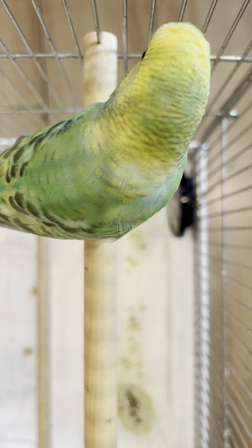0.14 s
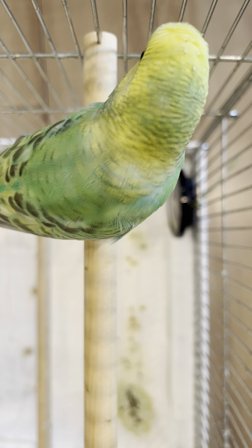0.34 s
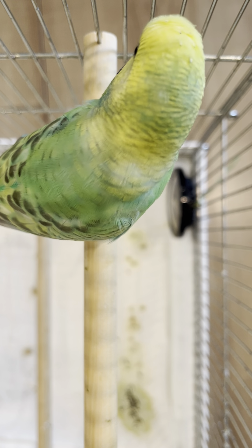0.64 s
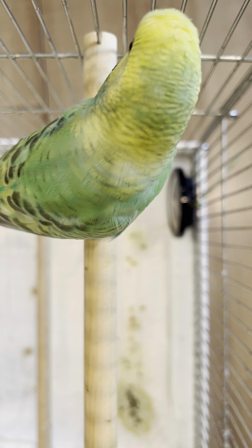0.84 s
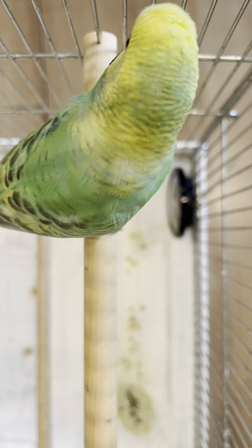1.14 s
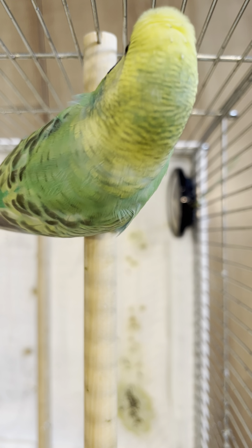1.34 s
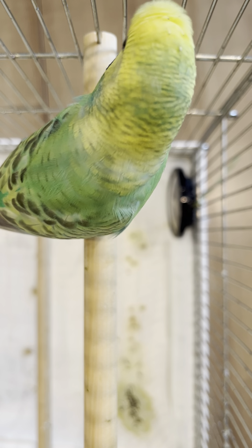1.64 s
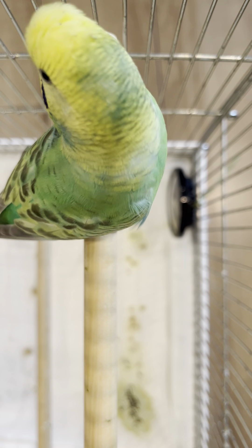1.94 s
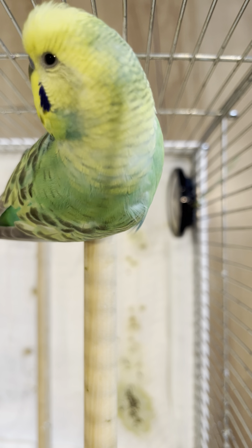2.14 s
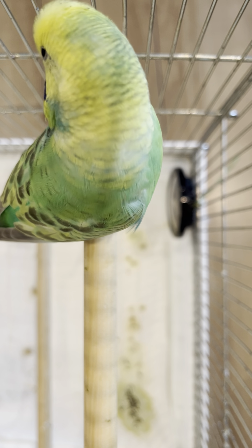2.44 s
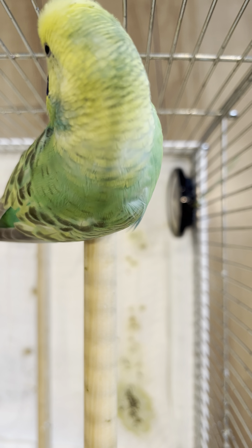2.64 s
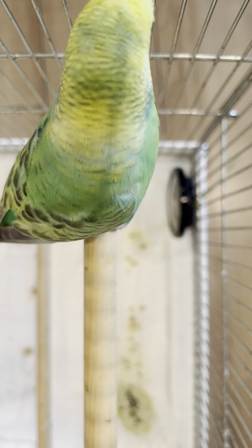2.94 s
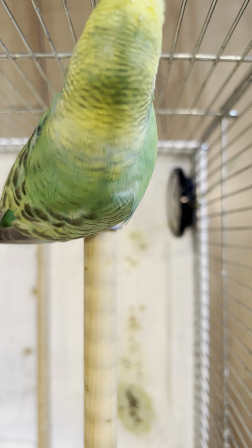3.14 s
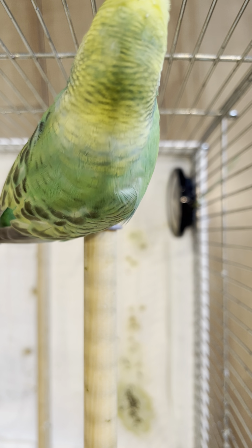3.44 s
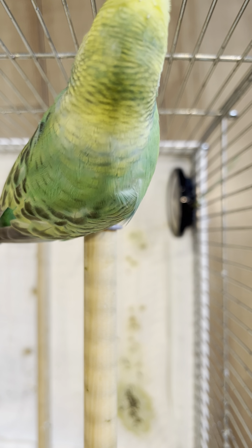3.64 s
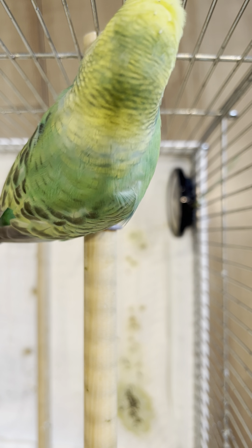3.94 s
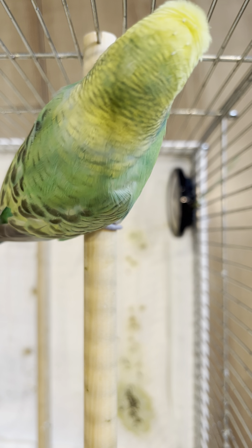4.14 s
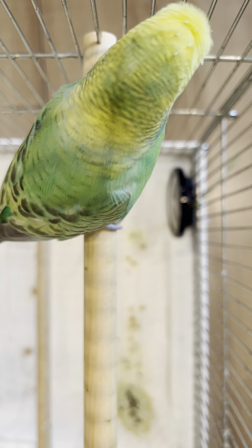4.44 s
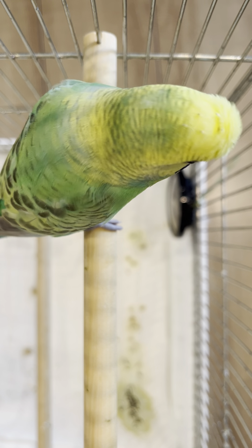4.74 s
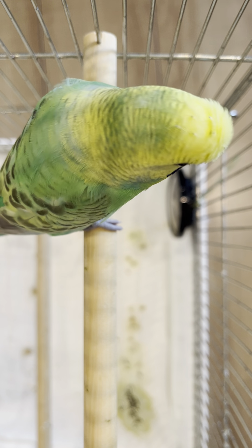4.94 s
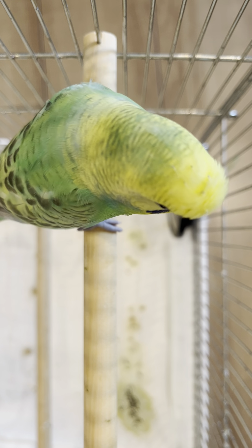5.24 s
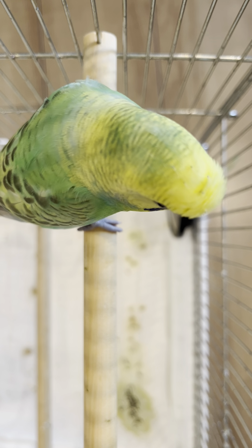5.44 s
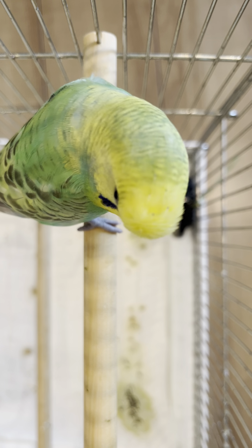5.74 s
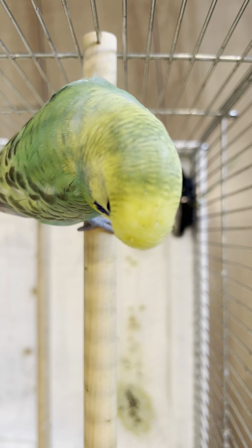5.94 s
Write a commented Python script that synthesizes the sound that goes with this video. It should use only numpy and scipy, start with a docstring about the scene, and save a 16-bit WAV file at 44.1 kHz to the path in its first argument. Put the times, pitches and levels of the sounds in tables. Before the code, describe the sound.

Close stereo phone pickup of one small parrot in a wire cage indoors, over low electrical hum and soft room air. Its song is irregular: faint peeps, low mutters, a piercing rising screech with a harsh squawk, and a pause with feather rustle. Chirps, rattling and crackling follow, then an abrupt snap, one very bright chirp, a warbling trill and soft closing peeps. Cage and walls give short reflections.

```python
"""Budgerigar on its perch

A budgerigar warbles close to a phone, in a small room with a mains hum, rumble and soft air.
Its whistles are gliding tones chopped by a flutter, with noise where they break into rasps.
Between them come low harmonic mutters, squawks of pulses and air ringing the throat, and a snap,
beak ticks and feather rustles of filtered noise. The cage and the walls answer with short echoes."""
import sys
import numpy as np
from scipy import signal
from scipy.fft import rfft, irfft
from scipy.io import wavfile
from scipy.ndimage import uniform_filter1d

SR = 44100
rng = np.random.default_rng(int(sys.argv[2]) if len(sys.argv) > 2 else 0)


def store_wav(level_fs):
    """Save 16-bit WAV to argv[1]."""
    pcm = np.round(np.clip(np.atleast_2d(level_fs), -1, 1) * 32767)
    wavfile.write(sys.argv[1], SR, pcm.T.astype(np.int16))


N = 269010
T = np.arange(N) / SR  # time in s

# Colours are filter curves: hz, gain_db. Bursts: start_s, attack_s, hold_s, release_s per 20 dB, level_db.
# Mains hum: multiple of the hum pitch, level_db against each other
HUM_PARTIALS = [(1, 0.5), (2, -28.5), (3, -17), (5, -27)]
HUM_DB, RUMBLE_DB, AIR_DB = -47.5, -59, -63  # the hum and air waver around these
# Low room rumble, and the hiss of the room's air: hz, gain_db
RUMBLE_COLOUR = [(25, -25), (50, 7), (90, -5), (140, 4.5), (200, -12.5), (400, -12.5), (800, -28)]
AIR_COLOUR = [(200, 4.5), (350, -2.5), (550, -2.5), (900, -12.5), (1500, -14.5), (2200, -16.5), (3200, -26),
              (4800, -26), (6500, -37), (10000, -31.5), (15000, -57)]
# The cage rumbles dully as the bird shifts: bursts (start_s, attack_s, hold_s, release_s, level_db)
CAGE_SHIFTS = [(1.2, 0.0734, 0.0867, 0.17, -46.5), (1.58, 0.076, 0.082, 0.2354, -49),
               (2.62, 0.0401, 0.156, .6, -52), (3.96, .03, 0.0302, 0.23, -53),
               (4.75, 0.036, 0.0667, 0.0744, -52.5), (5.7, 0.052, 0.033, 0.25, -54)]
# The hum and rumble dip briefly: centre_s, half_length_s (to 1/e of the depth), depth_db
LOW_DIP = (5.3, 0.1334, -9)
# Room decay, quickest at the top: hz, time_s to fall 60 dB
ROOM_T60 = [(300, .6), (1500, .6), (3500, .6), (8000, .5), (11000, .36), (15000, .27)]
# Phase difference between left and right at each pitch, which gives the bird its stereo width:
# hz, phase_radians
STEREO_PHASE = [(0, 1), (1900, 0.68), (2400, 1.06), (2950, 2.214), (3400, 1.414), (4000, 1.336),
                (4800, 1.478), (5600, 2.643), (6700, 3.963), (8350, 4.64), (10200, 7.07), (11200, 8.036),
                (12800, 9.5), (15200, 11.31)]
TOP_HZ = 15750  # top of the phone's treble

# Feathers brush as the bird turns its head: bursts (start_s, attack_s, hold_s, release_s, level_db)
RUSTLES = [(2.226, 0.0048, 0.026, 0.0154, -60.5), (2.39, 0.042, .08, 0.09, -62),
           (5.84, 0.0173, 0.016, 0.02, -57.5)]
# Colour of the feathers: hz, gain_db
FEATHER_COLOUR = [(800, -6), (2200, 1.5), (4500, -7.5), (6000, -19), (9000, -19), (14000, -32.5)]
# Beak ticks: time_s, level_db before the ticks' trim, treble_db against the whole
TICKS = [(0.694, -24.5, -35.5), (2.514, -31, -35), (2.722, -37, -35.5), (2.798, -34, -10),
         (3.704, -42, -12.5), (3.739, -31, -34), (3.968, -39, -8), (4.004, -26, -2.5), (4.055, -33, -32),
         (4.072, -22, -36), (4.097, -31.5, -45.5), (4.641, -46.5, 0), (4.729, -41, -0.5),
         (5.037, -40.5, -8), (5.066, -39.5, -22), (5.467, -33, -10)]
# Faint peeps, mostly between the phrases, two under the screech:
# time_s, pitch_hz, level_db before the peeps' trim
PEEPS = [(.17, 1424, -57), (0.331, 1400, -60), (.44, 1432, -53.5), (.975, 1304, -57), (1.148, 1313, -38.5),
         (1.215, 1500, -40.5), (2.24, 1960, -47), (2.309, 1997, -58), (2.46, 1369, -52),
         (4.93, 2107, -58.5), (5.785, 1321, -57.5), (5.86, 2398, -45.5), (5.939, 2177, -53)]
# Muttered syllables: start_s, length_s, first_hz, middle_hz, last_hz, level_db at the start, hoarseness 0-1
MUTTERS = [(.99, 0.1406, 290.1, 420.6, 329.8, -44, .25), (1.13, .17, 330.1, 459.2, 590, -52, .15),
           (3.09, .16, 341, 289.3, 254, -50, 1), (4.748, 0.0328, 460.4, 369.9, 292.8, -45.5, .1),
           (4.78, .08, 310.5, 359.3, 239.3, -45.5, 0.2), (5.705, .2, 442.3, 319.4, 292, -48, 0.8)]
# Throat colour of the mutters: hz, gain_db
MUTTER_THROAT = [(150, -8), (350, -0.5), (750, -2.5), (1200, -11), (1800, -15.5), (3000, -21.5)]

# Harsh calls: bursts (start_s, attack_s, hold_s, release_s, level_db before each call's trim),
# each kind with its own throat colour (hz, gain_db)
GRUMBLE = [(.691, .008, .06, .07, -40)]
GRUMBLE_THROAT = [(300, -7), (550, -9), (900, -15), (1400, -1.5), (1900, -9.5), (2600, -26), (3500, -5.5),
                  (4900, -12), (6200, -29), (7700, -22.5), (11500, -30.5), (14000, -22)]
SQUAWK = [(1.617, 0.0463, 0.0089, 0.051, -44), (1.671, 0.0108, 0.0692, 0.039, -32.5),
          (1.735, 0.0359, 0.0578, 0.0753, -28)]
SQUAWK_THROAT = [(290, -42), (500, -20), (1080, -25), (2810, -4), (3390, -10), (4150, 6), (5020, -10),
                 (5550, -16), (5800, -72.5), (7100, -14.5), (8330, -8.5), (10800, -23), (12100, -66),
                 (13300, -11.5), (16000, -30.5)]
RATTLE = [(3.402, 0.0154, .033, 0.0135, -38.5), (4.05, .004, 0.0216, 0.053, -44)]
RATTLE_THROAT = [(210, -49), (350, -12), (730, -2), (1380, 1), (1520, -2.5), (1820, 3.5), (3230, -9),
                 (3850, -17), (5940, -37), (8440, -31.5), (16000, -52)]
CRACKLE = [(3.51, 0.0286, 0.0094, 0.1745, -45.5)]
CRACKLE_THROAT = [(2000, -18.5), (3800, 2.5), (6000, 0.5), (8500, -4.5), (12300, -13.5), (15000, -8.5)]
BUZZ = [(4.757, 0.02517, 0.005964, .025, -30.5), (4.8, .005, 0.0261, 0.018, -43.5)]
BUZZ_THROAT = [(1470, -52.5), (2500, -38.5), (2990, -26.5), (3360, -64), (3660, -36), (4880, -4.5),
               (5480, -2), (5920, -10), (10100, -16), (11600, -12.5), (12200, -24), (13500, -22),
               (16000, -17)]
# The snap, a crack and then a puff: bursts (start_s, attack_s, hold_s, release_s, level_db)
SNAP = [(4.4074, .0013, .0018, .002, -11.5), (4.411, .003, .028, 0.0778, -28)]
# Throat colour of the snap: hz, gain_db
SNAP_THROAT = [(240, -77), (400, -33), (893, -10), (1930, -9.5), (2360, -2.5), (3020, -9.5), (4110, 1.5),
               (5030, -14.5), (5870, -19), (9180, -29), (11900, -51), (12700, -64), (13700, -34),
               (16000, -31)]

# What the throat and open beak pass of a whistle's overtones: hz, gain_db
BEAK_COLOUR = [(3200, -0.5), (5000, 7.5), (6000, -10), (7400, 2.5), (8800, 1), (10200, -10.5), (11300, -5),
               (12300, -16.5), (13600, 5), (15000, -1.5)]
# Rasp of a whistle that breaks up: hz, gain_db
RASP_COLOUR = [(700, -18), (1400, -11.5), (2400, 17), (4500, 0), (5800, -16)]
# Thin sizzle at the very top: hz, gain_db
SIZZLE_COLOUR = [(13200, 0.0034), (15500, 0)]
# Pitch bend of each flutter pulse, and of the rasp (shares of the pitch, at full depth and rasp)
ARCH, RASP_BEND = .2, .14
# Soft twitters: start_s, length_s, start_hz, end_hz, level_db, rasp 0-1
TWITTERS = [(2.53, .06, 2000, 1700, -56, 0.98), (2.592, .065, 2940, 2290, -57, 0.91),
            (2.661, .015, 1956, 1690, -48.5, 0.47), (2.684, .029, 1163, 1360, -49.5, .8),
            (2.718, .007, 2156, 2180, -42.5, 0.49), (2.835, .027, 2070, 2600, -47, 1),
            (3.368, .042, 2247, 1600, -43.5, 1), (3.505, 0.02187, 2239, 2460, -44, 0.65),
            (3.547, .135, 1836, 2150, -48, 0.51), (3.775, .044, 1941, 2410, -45.5, .9),
            (4.042, .012, 1940, 1935, -42.5, 0.39), (4.122, .036, 2030, 2600, -51, .6),
            (4.164, .016, 1698, 1600, -38.5, 0.29), (4.185, .042, 1296, 1065, -44.5, 0.94),
            (4.235, .066, 2020, 2560, -38.5, 0.29), (4.669, 0.042, 1605, 2950, -51.5, 0.38),
            (5.101, 0.019, 2017, 3430, -33.5, 0.91)]
# A trill that swoops up, down and up again: time_s, pitch_hz, level_db
TRILL = [(5.36, 1850, -45), (5.4, 1959, -43.5), (5.467, 3107, -32), (5.48, 2400, -28.5), (5.52, 1753, -44),
         (5.535, 1051, -39), (5.562, 889.6, -38.5), (5.595, 1468, -40), (5.622, 1955, -31.5),
         (5.672, 2864, -35.5), (5.697, 2413, -40.5)]
# One long screech that climbs as the bird pushes harder:
# time_s, level_db, pitch_hz, treble_db against the whole before its trim, rasp 0-1
SCREECH = [(1.0, -55.5, 1450, -19, 1), (1.05, -41, 1697, -21, 1), (1.125, -46, 2246, -13, .3),
           (1.19, -40, 2560, -18, .1), (1.216, -29, 2398, -6, 0.79), (1.232, -35.5, 2484, -3, 0.28),
           (1.254, -20, 2430, -12, 0.07), (1.292, -21, 2734, -6, 0.19), (1.302, -18.5, 3899, -5, .8),
           (1.314, -20.5, 4650, -3, .5), (1.321, -15.5, 3700, -9.5, 0.16), (1.336, -18.5, 3765, -8.5, 0.19),
           (1.346, -34, 3894, -6.5, 0.48)]
# Full rising chirps: start_s, length_s, loudest_after_s, breaks_after_s, start_hz, end_hz, peak_db,
# overtones_db away from the break, left_minus_right_db before the lean
CHIRPS = [(2.877, 0.1847, .143, 0.07795, 2433, 3540, -27, -22.5, 1),
          (3.817, 0.1139, .012, 0.05478, 2582, 3170, -28.5, -21.5, -0.5),
          (5.126, .142, .072, .108, 2440, 3220, -11.8, -22.5, -6)]
# A chirp holds its pitch, then climbs (shares of its length); it sits this far below its peak at its ends
CLIMB_FROM, CLIMB_TO, SWELL_DB, SINK_DB = .25, .78, 18, 13
# Its flutter (depth 0-1) smooths out as it climbs
CHIRP_FLUTTER_HZ, DEPTH_LOW, DEPTH_HIGH = 113, .95, .4
# Its rasp (0-1) rises for a short stretch where the voice breaks
RASP_CLEAR, RASP_BROKEN, BREAK_S = .15, .48, .024
# Near one pitch a chirp leans much further to one side: pitch_hz, width_hz, times further
LEAN = (3400, 160, 2)


def undb(db):
    """Decibels to gain."""
    return 10 ** (np.asarray(db) / 20)


def unit(x):
    """Scale to rms 1."""
    return x / np.sqrt(np.mean(x ** 2) + 1e-20)


def noise():
    """White noise for the whole scene."""
    return rng.standard_normal(N)


def wobble(hz):
    """Smooth chance with spread 1: noise with what is faster than hz filtered off."""
    return unit(signal.sosfilt(signal.butter(2, hz, fs=SR, output="sos"), noise()))


def colour(x, points):
    """Causal filter through (hz, gain_db) points, falling away beyond both ends."""
    size = 2048
    hz, db = np.transpose(points)
    octave = np.log2(np.fft.rfftfreq(size, 1 / SR) + 1)
    beyond = np.abs(octave - np.clip(octave, np.log2(hz[0]), np.log2(hz[-1])))
    gain_db = np.interp(octave, np.log2(hz), db) - np.minimum(36 * beyond, 45)
    # folding the cepstrum onto positive times gives the minimum-phase response
    cepstrum = irfft(np.log(undb(gain_db)))
    cepstrum[1:size // 2] *= 2
    cepstrum[size // 2 + 1:] = 0
    response = irfft(np.exp(rfft(cepstrum)))
    return signal.oaconvolve(x, response)[:N]


def gate(t, start, end, edge_s=0.0035):
    """1 between start and end, with soft edges."""
    opening = np.clip((t - start) / edge_s + .5, 0, 1)
    closing = np.clip((end - t) / edge_s + .5, 0, 1)
    return opening * closing


def loudness(bursts):
    """Gain of a list of bursts: each rises evenly, holds, and dies away."""
    gain = np.zeros(N)
    for start, attack, hold, release, db in bursts:
        rise = np.clip((T - start) / attack, 0, 1)
        fall_db = 20 * np.maximum(T - start - attack - hold, 0) / release
        gain += rise * undb(db - fall_db)
    return gain


def steady(x, size=700):
    """Even out the level over a window of size samples, keeping the faster pulses."""
    return x / np.sqrt(np.abs(uniform_filter1d(x ** 2, size)) + 1e-9)


def current(table):
    """For every moment, the columns of the latest row that has begun."""
    rows = np.array(table)
    return rows[np.maximum(np.searchsorted(rows[:, 0], T) - 1, 0)].T


def follow(curve):
    """A gate that is open during a curve, then each of its columns joined by straight lines."""
    s, *columns = np.transpose(curve)
    return [gate(T, s[0], s[-1])] + [np.interp(T, s, column) for column in columns]


def pan(x, db):
    """Share a sound between left and right; db is left minus right."""
    return x * np.sqrt(2 / (1 + undb(np.reshape([-db, db], (2, -1))) ** 2))


def background(hum_hz=100, waver_db=1.38, side_db=-7):
    """An appliance hums at twice the mains rate, wavering a little, over a rumble and the room's soft air."""
    phase = 2 * np.pi * hum_hz * T + 0.054 * wobble(1.6)
    partials = sum(undb(db) * np.sin(k * phase) for k, db in HUM_PARTIALS)
    hum = unit(partials) * undb(HUM_DB + waver_db * wobble(3.9))
    rumble = unit(colour(noise(), RUMBLE_COLOUR)) * (undb(RUMBLE_DB) + loudness(CAGE_SHIFTS))
    mid, side = (unit(colour(noise(), AIR_COLOUR)) * undb(AIR_DB + 2.3 * wobble(15)) for _ in range(2))
    dip_s, half_s, dip_db = LOW_DIP
    low = (hum + rumble) * undb(dip_db * np.exp(-((T - dip_s) / half_s) ** 2))
    return low + mid + undb(side_db) * side * np.array([[1], [-1]])


def echoes(x, cage_db, room_db, cage_s=0.012, gap_s=0.012):
    """Quick reflections from the cage and its tray, then the room's tail: two unrelated sets."""
    age = np.arange(SR) / SR
    hz, t60 = np.transpose(ROOM_T60)
    bins = np.log(np.fft.rfftfreq(SR, 1 / SR) + 1)
    out = []
    for _ in range(2):
        white = rfft(rng.standard_normal(SR))
        tail = np.zeros(SR)
        # each overlapping band of noise dies away at its own rate
        for band, band_t60 in zip(np.eye(len(hz)), t60):
            band_noise = irfft(white * np.interp(bins, np.log(hz), band))
            tail += band_noise * np.exp(-np.log(1000) * age / band_t60)
        tail *= age > gap_s
        cage = rng.standard_normal(SR) * np.exp(-age / cage_s) * (age > .001)
        response = (undb(cage_db) * unit(cage) + undb(room_db) * unit(tail)) / np.sqrt(SR)
        out.append(signal.fftconvolve(x, response)[:N])
    return np.array(out)


def stereo_width(left, right):
    """Turn the phase of the right side against the left at each pitch, which gives the bird its width."""
    hz, radians = np.transpose(STEREO_PHASE)
    turn = np.exp(-1j * np.interp(np.fft.rfftfreq(N, 1 / SR), hz, radians))
    return np.array([left, irfft(rfft(right) * turn, N)])


def rustles(grain_db=3):
    """Feathers slide over each other in soft, grainy strokes."""
    return unit(colour(noise(), FEATHER_COLOUR)) * loudness(RUSTLES) * undb(grain_db * wobble(120))


def ticks(decay_s=.001, trim_db=-5):
    """The beak clicks shut: a very short knock with a bright edge."""
    knock = unit(colour(noise(), [(700, -14), (2000, 1), (4500, -13.5), (7000, -3.5)]))
    edge = unit(colour(noise(), [(4000, 16.5), (9000, 15.0), (12300, 15.5), (15000, -9.5)]))
    out, age = np.zeros(N), np.arange(SR // 20) / SR
    for s, level_db, treble_db in TICKS:
        at = int(s * SR) + np.arange(len(age))
        share = min(undb(treble_db), .95)
        click = np.sqrt(1 - share ** 2) * knock[at] + share * edge[at]
        out[at] += undb(level_db + trim_db) * np.exp(-age / decay_s) * click
    return out


def peeps(length_s=0.012, unsteady=.13, trim_db=-1):
    """Short unsteady whistles, barely voiced: sines in a bell-shaped swell, their pitch shaken at random."""
    s, hz, level_db = np.transpose(PEEPS)
    nearest = np.searchsorted(np.sort(s[1:] + s[:-1]) / 2, T)
    phase = 2 * np.pi * np.cumsum(hz[nearest] * (1 + unsteady * wobble(600))) / SR
    swell = np.exp(-((T - s[nearest]) / length_s) ** 2)
    return np.sin(phase) * undb(level_db[nearest] + trim_db) * swell


def mutters(jitter=0.077, air_db=-2, attack_s=0.012, fade_db=11):
    """The bird's soft low register: a stack of harmonics slides along an arc, fades, and can turn hoarse."""
    start, length, first, middle, last, db, hoarse = current(MUTTERS)
    along = np.clip((T - start) / length, 0, 1)
    hz = first + (last - first) * along + (middle - (first + last) / 2) * np.sin(np.pi * along)
    phase = 2 * np.pi * np.cumsum(hz * (1 + jitter * hoarse * wobble(180))) / SR
    stack = unit(sum(np.sin(k * phase) for k in range(1, 8)))
    air = unit(colour(noise(), MUTTER_THROAT))
    voice = unit(colour(stack, MUTTER_THROAT)) + undb(air_db) * hoarse * air
    edges = np.clip(np.minimum(T - start, start + length - T) / attack_s, 0, 1)
    return steady(voice) * undb(db - fade_db * along) * edges


def harsh(bursts, throat, rate_hz, jitter, puff_cycles, air_db, trim_db):
    """Uneven slaps of the membrane, each with a puff of air, ring the throat; the effort trembles."""
    cycles = np.cumsum(rate_hz * np.exp(jitter * wobble(150))) / SR
    slaps = np.diff(np.floor(cycles), prepend=0) * undb(1.4 * noise())
    puffs = np.exp(-(cycles % 1) / puff_cycles) * noise()
    tremble_db = 2.5 * wobble(90)
    voice = steady(colour(unit(slaps) + undb(air_db) * unit(puffs), throat))
    return voice * loudness(bursts) * undb(trim_db + tremble_db)


def snap():
    """An explosive crack of air through the open beak, and its puff: noise coloured by the throat."""
    return steady(colour(noise(), SNAP_THROAT), size=100) * loudness(SNAP)


def whistle(start, hz, gain, rate_hz, depth, rasp, bright_db, sizzle_db, jitter,
            rasp_am=0.58, rasp_db=-8, hiss_db=0):
    """A membrane sings a glide; a slower flutter chops it and bends each pulse into an arch."""
    depth, rasp = np.clip(depth, 0, 1), np.clip(rasp, 0, 1)
    # the flutter starts afresh with each note, and opens faster than it closes
    cycles = np.cumsum(rate_hz * (1 + jitter * wobble(90))) / SR
    cycles -= np.interp(start, T, cycles)
    opening = np.sin(np.pi * (cycles % 1) ** .7) ** 2
    chopped = uniform_filter1d(1 - depth + depth * opening ** 2, size=25)
    pulse = steady(chopped * np.exp(rasp_am * rasp * wobble(410)))
    arch = ARCH * depth * (np.sqrt(opening) - .85)
    # even a clear voice shakes a little
    shake = RASP_BEND * np.clip(rasp, .12, 1) * wobble(700)
    phase = 2 * np.pi * np.cumsum(hz * (1 + arch + shake)) / SR
    tone = np.sqrt(2) * np.sin(phase) + undb(rasp_db) * rasp * unit(colour(noise(), RASP_COLOUR))
    # the membrane slaps shut: overtones, air hissing through the gap, and a thin sizzle
    slap = sum(np.sin(k * phase) / np.sqrt(k) for k in range(2, 5))
    overtones = steady(colour(unit(slap) + undb(hiss_db) * noise(), BEAK_COLOUR))
    # filtered twice for steeper sides
    sizzle = unit(colour(colour(noise(), SIZZLE_COLOUR), SIZZLE_COLOUR))
    bright = overtones + undb(sizzle_db) * sizzle
    voice = gain * pulse * (tone + undb(bright_db) * bright)
    # so small a beak radiates no bass
    return signal.sosfilt(signal.butter(4, 650, "high", fs=SR, output="sos"), voice)


def twitters(pan_db=-1):
    """Quiet straight glides, chopped into separate pips by a slow, deep flutter."""
    start, length, hz0, hz1, db, rasp = current(TWITTERS)
    hz = hz0 + (hz1 - hz0) * np.clip((T - start) / length, 0, 1)
    gain = undb(db) * gate(T, start, start + length)
    voice = whistle(start, hz, gain, rate_hz=85, depth=0.72, rasp=rasp,
                    bright_db=-25.5, sizzle_db=-18, jitter=.04)
    return pan(voice, pan_db)


def trill(pan_db=-2):
    """A nearly pure, fluttering whistle whose rasp and overtones grow with its pitch."""
    sounding, hz, db = follow(TRILL)
    voice = whistle(TRILL[0][0], hz, sounding * undb(db), rate_hz=108, depth=.8,
                    rasp=0.2955 * (hz / 2200) ** 2, bright_db=-27 + 15.6 * np.log2(hz / 2200),
                    sizzle_db=-2, jitter=0.064)
    return pan(voice, pan_db)


def screech(cycles_per_flutter=5.5, treble_trim_db=3.5):
    """The flutter runs so fast that it splits the whistle into a stack of lines, moving with the pitch."""
    sounding, level_db, hz, treble_db, rasp = follow(SCREECH)
    return whistle(SCREECH[0][0], hz, sounding * undb(level_db), hz / cycles_per_flutter, depth=.8,
                   rasp=rasp, bright_db=treble_db + treble_trim_db, sizzle_db=-16, jitter=.03)


def chirps(swell_shape=1.8, sink_shape=2, lurch=.03, held_s=.013):
    """Each chirp swells and climbs, its flutter smoothing out; on the way the voice breaks into a rasp."""
    start, length, peak, breaks, hz0, hz1, db, bright_db, pan_db = current(CHIRPS)
    age = T - start
    climb = np.clip((age / length - CLIMB_FROM) / (CLIMB_TO - CLIMB_FROM), 0, 1)
    broken = np.exp(-((age - breaks) / BREAK_S) ** 2)
    hz = hz0 + (hz1 - hz0) * climb
    # at its loudest the membrane stays open for a moment and holds a plain tone
    fluttering = 1 - np.exp(-((age - peak) / held_s) ** 4)
    depth = (DEPTH_LOW + (DEPTH_HIGH - DEPTH_LOW) * climb) * fluttering
    swell_db = SWELL_DB * np.clip(1 - age / peak, 0, 1) ** swell_shape
    sink_db = SINK_DB * np.clip((age - peak) / (length - peak), 0, 1) ** sink_shape
    gain = undb(db - swell_db - sink_db) * gate(age, 0, length)
    # the pitch lurches where the voice breaks
    voice = whistle(start, hz * (1 + lurch * broken * wobble(200)), gain, CHIRP_FLUTTER_HZ, depth,
                    RASP_CLEAR + (RASP_BROKEN - RASP_CLEAR) * broken, bright_db + 3 * broken,
                    sizzle_db=4 + 1.3 * (db - db.max()), jitter=.015)
    lean_hz, width_hz, further = LEAN
    return pan(voice, pan_db * (1 + further * np.exp(-((hz - lean_hz) / width_hz) ** 2)))


def scene():
    """The bird's voices and their echoes, widened to stereo, over the room's background."""
    song = chirps() + twitters() + screech() + trill()
    calls = (
        harsh(GRUMBLE, GRUMBLE_THROAT, rate_hz=160, jitter=.3, puff_cycles=.3, air_db=7.5, trim_db=-1.5)
        + harsh(SQUAWK, SQUAWK_THROAT, rate_hz=330, jitter=.29, puff_cycles=.392, air_db=-1.5, trim_db=-5)
        + harsh(RATTLE, RATTLE_THROAT, rate_hz=170, jitter=.3, puff_cycles=.24, air_db=3, trim_db=3)
        + harsh(BUZZ, BUZZ_THROAT, rate_hz=330, jitter=.044, puff_cycles=.35, air_db=-2, trim_db=2.5)
        + harsh(CRACKLE, CRACKLE_THROAT, rate_hz=85, jitter=.26, puff_cycles=.3816, air_db=4.5, trim_db=-1.5)
        + ticks())
    burst = snap()
    soft = mutters() + peeps() + rustles()
    # the snap and the soft sounds spread more widely than the beamed whistles
    into_room = song.mean(axis=0) + calls + undb(2.5) * burst + undb(7.5) * soft
    shared, unlike = echoes(into_room, cage_db=-9, room_db=-19.5)
    # left and right share most of the room
    reflected = shared + 0.41 * unlike * np.array([[1], [-1]])
    left, right = song + calls + burst + soft + reflected
    return stereo_width(left, right) + background()


def record(dry):
    """The phone rounds the loudest peaks and cuts the top of the treble."""
    return signal.sosfilt(signal.ellip(10, .2, 80, TOP_HZ, fs=SR, output="sos"), np.tanh(dry))


dry = scene()
out = record(dry)
store_wav(out)
```